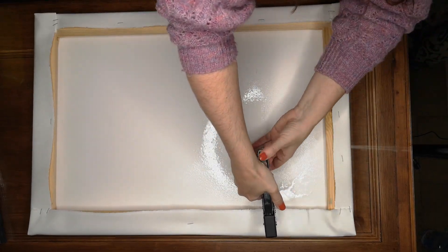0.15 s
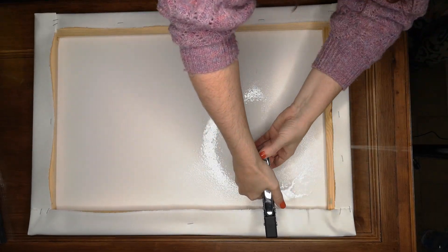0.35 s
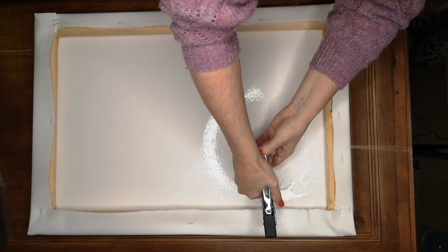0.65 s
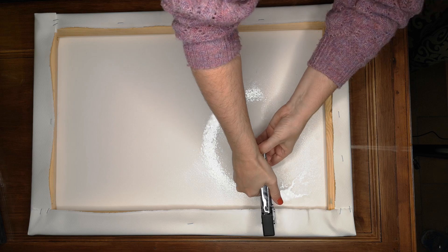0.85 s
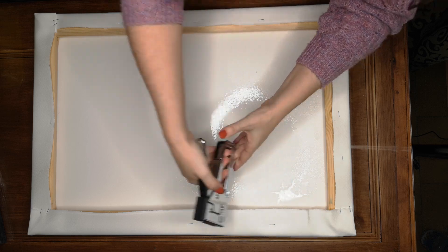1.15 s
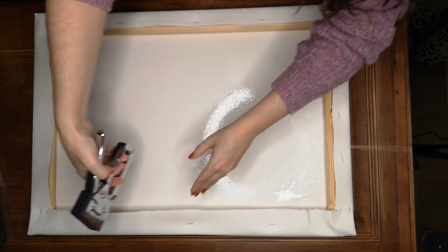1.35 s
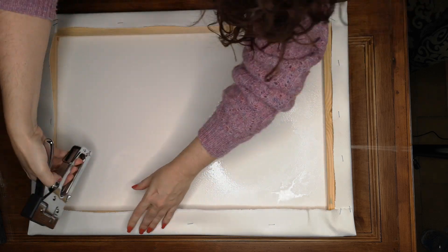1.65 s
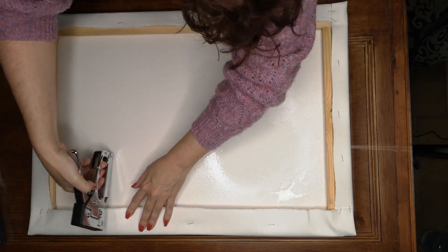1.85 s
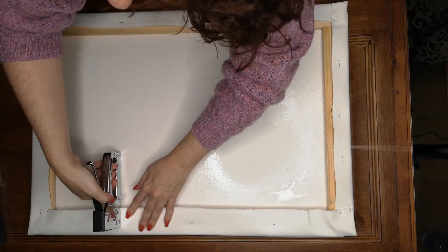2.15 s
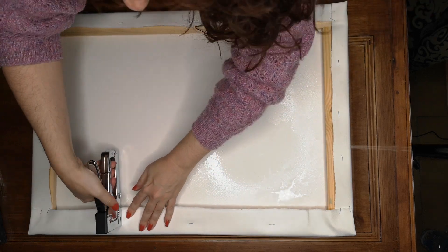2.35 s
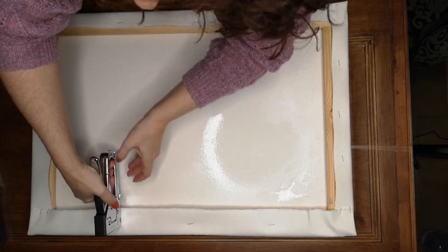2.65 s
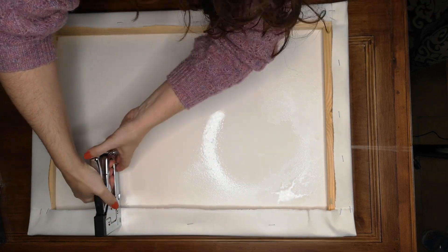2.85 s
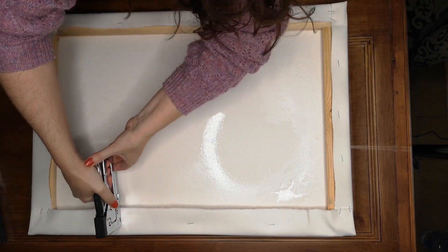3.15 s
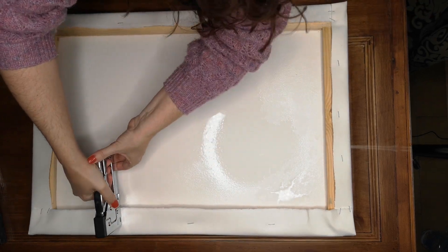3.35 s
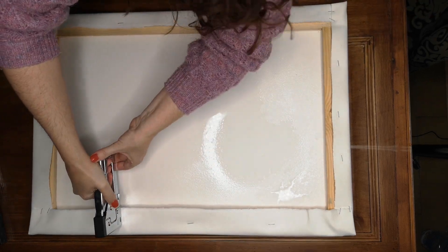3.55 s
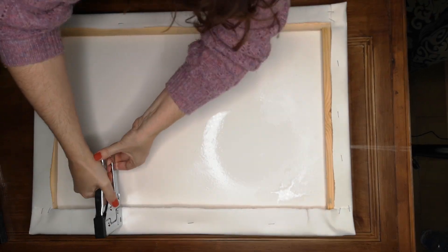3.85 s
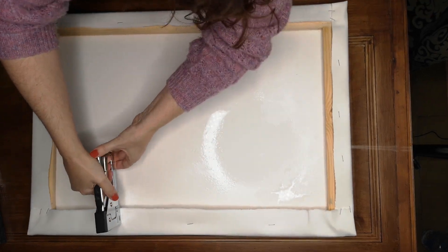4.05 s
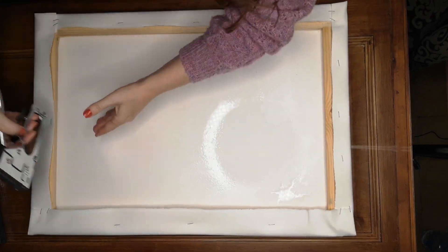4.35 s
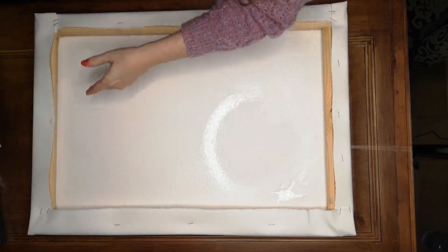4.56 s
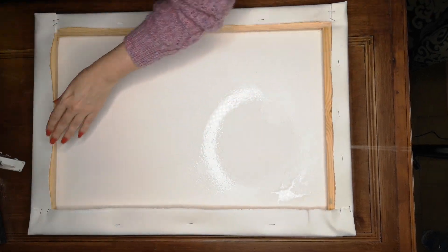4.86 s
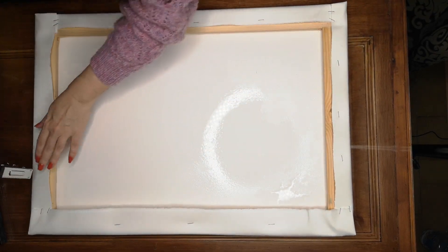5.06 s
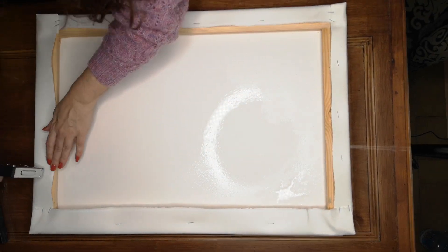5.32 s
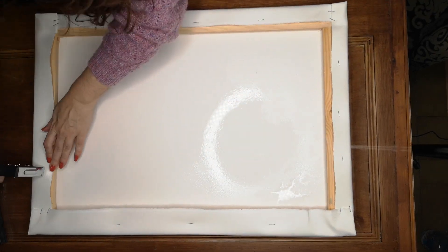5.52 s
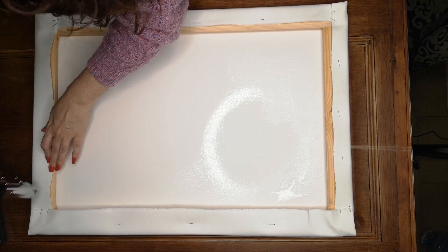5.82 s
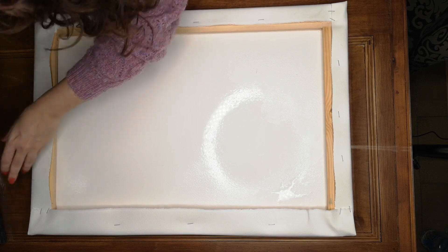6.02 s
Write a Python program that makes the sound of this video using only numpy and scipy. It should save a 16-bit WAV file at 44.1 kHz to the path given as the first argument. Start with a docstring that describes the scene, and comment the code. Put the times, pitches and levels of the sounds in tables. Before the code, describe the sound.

A hand staple gun fires two hard, cracking shots into a wooden frame, each followed by a ringing lever snap, then is laid down.

```python
"""Hands rustle over a steady low machine hum and room air: a staple gun fixes damp paper to a wooden frame on a table.
Twice the lever catches, the spring fires a staple, and the lever unlatches, slides and snaps back with a ring.
Loose steel ticks now and then between and after the shots; at the end the gun is laid down, rocks and settles.
Blows are filtered noise bursts, ringing is damped sines, rubbing is grainy noise; a small live room echoes all
but the hum and air."""
import sys
import numpy as np
from scipy import signal
from scipy.fft import rfft, irfft
from scipy.io import wavfile
from scipy.ndimage import uniform_filter1d

SR = 44100
rng = np.random.default_rng(int(sys.argv[2]) if len(sys.argv) > 2 else 0)


def to_wav(sig):
    """Store sig (one row per channel, or 1-D mono) as 16-bit WAV at the path in sys.argv[1].

    Samples outside -1..1 are clipped; the rate is SR.
    """
    pcm = np.clip(np.atleast_2d(sig), -1, 1) * 32767
    pcm = np.round(pcm).astype(np.int16)
    wavfile.write(sys.argv[1], SR, pcm.T)  # frames by channels


N = 272840
T = np.arange(SR) / SR  # one second of time, in seconds
HZ = np.fft.rfftfreq(SR, 1 / SR)


def amp(db):
    """Decibels to gain."""
    return 10 ** (np.asarray(db) / 20)


def unit(x):
    """Scales to rms 1."""
    return x / np.sqrt(np.mean(x ** 2) + 1e-20)


def read(points, hz):
    """Reads a curve of (Hz, value) points along a log-frequency axis."""
    f, value = np.transpose(points)
    return np.interp(np.log(hz + 1), np.log(f + 1), value)


def add(mix, s, sound):
    """Mixes a sound in at time s, cut at the end of the mix."""
    part = mix[max(round(s * SR), 0):][:len(sound)]
    part += sound[:len(part)]


def dying(t60):
    """Exponential decay over one second, falling 60 dB in t60 seconds."""
    return np.exp(-np.log(1000) * T / max(t60, 1e-4))


def coloured(x, db):
    """Minimum-phase filter of unit energy shaped by the gain curve db over HZ, so attacks stay sharp."""
    log_gain = np.log(amp(np.maximum(db - db.max(), -80)))
    # folding the cepstrum forward in time makes the filter causal
    cepstrum = irfft(log_gain)
    cepstrum[1:SR // 2] *= 2
    cepstrum[SR // 2 + 1:] = 0
    taps = irfft(np.exp(rfft(cepstrum)))[:SR // 10]
    return signal.fftconvolve(x, taps / np.linalg.norm(taps))[:len(x)]


def hump(hz, slope_db):
    """A broad, round-topped resonance that falls towards slope_db per octave on each side."""
    return -slope_db * np.hypot(np.log2((HZ + 1) / hz), .5)


def clash(t60, rise, hold=0):
    """Parts chatter against each other: a dense burst that swells, holds and dies (all in seconds)."""
    swell = np.minimum(T / max(rise, 1e-5), 1)
    decay = np.exp(-np.log(1000) * np.maximum(T - hold, 0) / t60)
    shape = swell * decay
    burst = rfft(shape * rng.standard_normal(SR))
    flat = irfft(burst / (abs(burst) + 1e-12))  # hard contacts excite all frequencies alike
    even = flat * np.sqrt(shape)
    return even * np.linalg.norm(shape) / np.linalg.norm(even)


def ring(modes):
    """Damped modes (Hz, dB, t60 s), all struck at once with random phases."""
    out = np.zeros(SR)
    for (hz, db, t60), phase in zip(modes, rng.random(len(modes))):
        out += amp(db) * dying(t60) * np.sin(2 * np.pi * (hz * T + phase))
    return out


def contact(colour, db, t60, tilt_db):
    """One short blow on a damped body; a positive tilt (dB per octave) brightens it."""
    tilt = tilt_db * np.log2(HZ + 50)
    return amp(db) * coloured(clash(t60, rise=0.00023, hold=0.00046), read(colour, HZ) + tilt)


def tick(db, hz):
    """A small steel part clicks against its neighbour."""
    return amp(db) * coloured(clash(t60=0.02, rise=0.0011), hump(hz, slope_db=11.5))


def rub(length, db, hz):
    """One grainy stroke of two surfaces that stick and slip: noise with a fast, uneven loudness."""
    grip = unit(uniform_filter1d(rng.standard_normal(SR), size=260))
    grains = unit(rng.standard_normal(SR) * amp(4 * grip))
    stroke = np.sqrt(abs(np.sin(np.pi * np.minimum(T / length, 1))))
    return amp(db) * stroke * coloured(grains, hump(hz, slope_db=11.5))


# Hiss and rumble of the room air. Each row: frequency in Hz, relative density in dB per Hz.
AIR_SPECTRUM = [(10, -11), (20, -14), (42, -5), (56, -7.5), (68, -19.5), (105, -22.5), (130, -15),
                (350, -15), (410, -19), (640, -17.5), (1290, -24.5), (2840, -39), (4900, -46),
                (11900, -47.5), (16000, -52.5)]
# Machine hum and whine. Each row: frequency in Hz, rms level in dB.
HUM_TONES = [(56.8, -59.5), (51, -65.5), (223, -71), (271, -74.5), (638, -73), (7970, -95), (11520, -93),
             (12516, -95.5)]
AIR_DB = -59.5  # rms of the air above 100 Hz


def background(waver=.5):
    """Room air as shaped noise, with a machine hum and faint whine whose phases wander slightly."""
    f, t = np.fft.rfftfreq(N, 1 / SR), np.arange(N) / SR
    air = rfft(rng.standard_normal(N)) * amp(read(AIR_SPECTRUM, f))
    above_hum = np.std(irfft(air * (f > 100), N))
    out = amp(AIR_DB) * irfft(air, N) / above_hum
    for hz, db in HUM_TONES:
        drift = waver * np.cumsum(rng.standard_normal(N)) * np.sqrt(hz / 50 / SR)
        out += amp(db) * np.sqrt(2) * np.sin(2 * np.pi * hz * t + drift)
    return out


RATTLE_PER_S, RATTLE_OVER_RUSTLE_DB = 16, 12.5
RATTLE_SPREAD_DB, RATTLE_SPREAD_OCTAVES = 3, .7  # either way


def rattle(length, db, hz):
    """Faint ticks of uneven spacing, strength and pitch while the gun shifts in the hand."""
    out = np.zeros(SR)
    for k, (when, size, pitch) in enumerate(rng.uniform(-1, 1, (10, 3))):
        s = (k + (when + 1) / 2) / RATTLE_PER_S
        if s < length:
            add(out, s, tick(db + RATTLE_SPREAD_DB * size, hz * 2 ** (RATTLE_SPREAD_OCTAVES * pitch)))
    return out


# The hands shift their grip. Each row: start in seconds, length in seconds, rustle level in dB, centre in Hz.
GRIP_CHANGES = [(0.0, 0.31, -70.5, 5000), (2.5, 0.28, -72, 2780), (4.87, 0.35, -71.5, 4200),
                (5.932, 0.3, -75.5, 4350)]


def grip_changes(blows):
    """Shifting hands rustle as one rub and rattle the gun faintly."""
    for s, length, db, hz in GRIP_CHANGES:
        add(blows, s, rub(length, db, hz))
        add(blows, s, rattle(length, db + RATTLE_OVER_RUSTLE_DB, hz))


# The gun bumps on the frame as it is placed. Each row: start in seconds, level in dB, tilt in dB per octave.
FRAME_KNOCKS = [(0.442, -48, 0.5), (1.782, -47.5, -1), (2.4179, -47.5, 1), (2.640, -43.5, -2),
                (3.3972, -42, -1)]
# Tone of the gun bumping on wood. Each row: frequency in Hz, relative density in dB per Hz.
KNOCK_SPECTRUM = [(59, -35.5), (100, -16.5), (547, -12), (910, -2), (1330, -12.5), (1450, -16.5),
                  (1680, -10), (1870, -15), (2800, -18), (3620, -29), (3940, -20.5), (5300, -29.5),
                  (5650, -39.5), (10900, -27.5), (16000, -33)]
KNOCK_T60_S = .028


def frame_knocks(blows):
    """The gun touches the damped frame in short, dull contacts."""
    for s, db, tilt_db in FRAME_KNOCKS:
        add(blows, s, contact(KNOCK_SPECTRUM, db, KNOCK_T60_S, tilt_db))


# Brief grainy rubs: the lever creaks as it is squeezed, the gun brushes paper and table.
# Each row: start in seconds, length in seconds, level in dB, centre in Hz.
BRIEF_RUBS = [(0.518, 0.031, -66.5, 4000), (1.869, 0.058, -67.5, 3100), (3.9, 0.077, -74, 2170),
              (5.317, 0.0894, -62, 10100), (5.307, 0.24, -65, 2800)]


def brief_rubs(blows):
    """Surfaces stick and slip in brief grainy strokes, as a lever creak or a brush on paper and table."""
    for s, *stroke in BRIEF_RUBS:
        add(blows, s, rub(*stroke))


# The lever catches as it is squeezed. Each row: start in seconds, level in dB, t60 in seconds, tilt in dB per octave.
LEVER_CATCHES = [(0.5733, -20.5, .014, 1), (3.5233, -22.5, 0.019, 1)]
# Tone of the catch. Each row: frequency in Hz, relative density in dB per Hz.
CATCH_SPECTRUM = [(88, -44), (150, -20), (240, -22.5), (504, -5.5), (960, -4), (1310, 0.5), (2020, -7),
                  (2650, -21), (2870, -18), (4240, -11.5), (9440, -27), (10800, -19), (16000, -27.5)]


def lever_catches(blows):
    """The squeezed lever catches with one short, damped clack."""
    for s, *blow in LEVER_CATCHES:
        add(blows, s, contact(CATCH_SPECTRUM, *blow))


# The spring fires. Each row: start in seconds, crack level in dB, frame level in dB, casing level in dB,
# place on the frame.
STAPLE_SHOTS = [(0.8040, 0, -14, -36, "right"), (3.8995, 0.5, -17, -28.5, "left")]
# Tone of the driver's crack. Each row: frequency in Hz, relative density in dB per Hz.
CRACK_SPECTRUM = [(60, -34.5), (130, -21.5), (400, -6.5), (1000, -3), (1550, -4.5), (2170, -4.5),
                  (2800, -6.5), (4000, -10), (4500, -5.5), (5300, -2.5), (7450, -11), (10500, -8.5),
                  (11500, -4), (16000, -15.5)]
# Dense ring of frame, paper and table, by place. Each row: frequency in Hz, relative density in dB per Hz.
FRAME_SPECTRA = {"right": [(60, -50), (115, -29), (190, -11.5), (240, -15), (376, -10.5), (440, -13.5),
                 (535, -5), (680, -18), (1100, -12.5), (1570, -13), (1900, -20), (6580, -33.5),
                 (11100, -28), (16000, -40)], "left": [(60, -45), (100, -29), (150, -11), (330, -7.5),
                 (440, -12.5), (532, -7), (650, -12), (1070, -5.5), (1270, -15.5), (1550, -3), (1750, -12),
                 (2430, -13.5), (3010, -5), (4000, -17), (6030, -22.5), (11100, -23.5), (16000, -27)]}
# Modes of the frame and its stretched sheet, by place. Each row: frequency in Hz, relative level in dB, t60 in seconds.
FRAME_RING_MODES = {"right": [(161.7, -6.5, .55), (204.7, -2.5, 0.7), (271.3, -6, .45), (321, -5.5, .4),
                    (384.4, -2.5, .48), (484, 0, .45), (539, 6, 0.64), (793, -3.5, .22), (1093, 2, 0.38),
                    (1250, 3, .24), (1560, 1, 0.34)], "left": [(165.6, -11, 0.79), (208.6, -4, 0.69),
                    (322, -2, .45), (365.5, 0, .42), (533, 1.5, .48), (813, 3.5, .2), (1030, 4, .25),
                    (1540, 1.5, .35)]}
# Modes of the gun's steel casing. Each row: frequency in Hz, relative level in dB, t60 in seconds.
CASING_MODES = [(2280, -2, .25), (2765, -0.5, .3), (2870, -3.5, 0.5), (2980, 0.5, 0.49), (3380, -7, 0.5),
                (5140, -6, .3), (7240, -2.5, 0.17), (11657, 0.5, .15)]


def shot(crack_db, frame_db, casing_db, place, modes_db=-9.5, swell=0.0028):
    """The driver slams the staple home; the heavier frame takes a moment to swing, then rings on."""
    crack = amp(crack_db) * coloured(clash(t60=0.032, rise=.003, hold=0.0033), read(CRACK_SPECTRUM, HZ))
    frame = amp(frame_db) * coloured(clash(t60=0.19, rise=0.0072), read(FRAME_SPECTRA[place], HZ))
    frame_ring = amp(frame_db + modes_db) * ring(FRAME_RING_MODES[place])
    casing_ring = amp(casing_db) * ring(CASING_MODES)
    return crack + frame, (frame_ring + casing_ring) * (1 - np.exp(-T / swell))


def staple_shots(blows, rings):
    """Places each shot, with its blow and its ringing kept apart for the room mix."""
    for s, *levels in STAPLE_SHOTS:
        blow, ringing = shot(*levels)
        add(blows, s, blow)
        add(rings, s, ringing)


# The frame hops and drops back on the table. The single row: start in seconds, level in dB, centre in Hz.
FRAME_REBOUND = (0.8497, -4, 480)


def frame_rebound(blows):
    """The frame drops back on the table: one smooth push through a broad resonance."""
    s, db, hz = FRAME_REBOUND
    push = np.pad(signal.windows.hann(12), (0, SR // 10))
    add(blows, s, amp(db) * coloured(push, hump(hz, slope_db=8)))


# The clearest clicks of loose steel in the gun. Each row: start in seconds, level in dB, centre in Hz.
LOOSE_TICKS = [(1.139, -48.5, 11160), (1.8973, -50, 9100), (2.4175, -41.5, 8150), (2.875, -55.5, 6000),
               (3.515, -46, 11000), (4.655, -50, 12040), (4.7543, -45, 11500)]


def loose_ticks(blows):
    """Loose steel parts click inside the gun."""
    for s, db, hz in LOOSE_TICKS:
        add(blows, s, tick(db, hz))


def cluster(hz, width, t60, count=36):
    """Closely spaced steel partials that beat as they die, weaker away from the centre."""
    spread = 5 * ((np.arange(count) + rng.random(count)) / count - .5)  # in widths
    partials = [(hz + width * u, -10 * np.log10(1 + (2 * u) ** 2), t60) for u in spread]
    return ring(partials) / np.sqrt(count / 6)


# The lever snaps back. Each row: start in seconds, snap level in dB, clash t60 in seconds, ring level in dB.
LEVER_RETURNS = [(1.2895, -3, 0.017, -39.5), (4.3542, -0.5, 0.01, -41.5)]
# Tone of the snap. Each row: frequency in Hz, relative density in dB per Hz.
SNAP_SPECTRUM = [(150, -23.5), (1050, -18.5), (1570, -3.5), (2000, -13.5), (3000, -13), (3450, -7),
                 (4000, -14.5), (4900, -6.5), (5480, 4), (6100, -5.5), (7200, -15), (8600, -5.5),
                 (9700, -7.5), (11400, 2.5), (13000, -12), (15400, -12)]
# Steel modes in lever and spring. Each row: centre in Hz, width in Hz, relative level in dB, t60 in seconds.
LEVER_CLUSTERS = [(1594, 115, -13, .75), (2150, 300, -9.5, .9), (3440, 150, -2.5, .7), (4160, 400, -15, .7),
                  (5650, 260, -10.5, .72), (6340, 700, -5, .6), (8527, 560, -7, .45),
                  (11300, 920, -3.5, 0.37)]
UNLATCH_LEAD_S, UNLATCH_DB, UNLATCH_HZ = .0405, -43.5, 11800
SLIDE_S, SLIDE_DB, SLIDE_HZ = .024, -45, 4900


def lever_snap(db, t60, ring_db):
    """Steel meets steel, and the lever and spring sing briefly."""
    snap = amp(db) * coloured(clash(t60, rise=.0005, hold=0.00084), read(SNAP_SPECTRUM, HZ))
    steel = sum(amp(level) * cluster(hz, width, decay) for hz, width, level, decay in LEVER_CLUSTERS)
    return snap + amp(ring_db) * steel


def lever_returns(blows):
    """The lever unlatches with a tick, then slides until it hits its stop."""
    for s, *snap in LEVER_RETURNS:
        add(blows, s - UNLATCH_LEAD_S, tick(UNLATCH_DB, UNLATCH_HZ))
        add(blows, s - SLIDE_S, rub(SLIDE_S, SLIDE_DB, SLIDE_HZ))
        add(blows, s, lever_snap(*snap))


# The hands bump the frame softly. Each row: start in seconds, level in dB.
HAND_BUMPS = [(2.06, -52.5), (2.25, -48), (4.96, -55.5)]


def hand_bumps(blows):
    """Soft hands meet the frame slowly, so the thud has little treble."""
    for s, db in HAND_BUMPS:
        add(blows, s, amp(db) * coloured(clash(t60=0.14, rise=.008), hump(152, slope_db=11)))


# The gun lands on one edge, falls flat and settles. Each row: start in seconds, level in dB, t60 in seconds,
# tilt in dB per octave.
GUN_SETTLING = [(5.4591, -27.5, 0.035, 2), (5.4640, -33, 0.09, -3), (5.4729, -34, 0.013, -2.5)]
# Modes of the table. Each row: frequency in Hz, relative level in dB, t60 in seconds.
TABLE_MODES = [(725, 2, .2), (885, 3, 0.42), (968, -6, .35), (1150, -4, .3), (1355, 2.5, 0.26),
               (1680, -1, 0.19), (2300, -10, .4), (2820, -13, .5), (3210, -14, 0.67), (4000, -4, 0.14)]
TABLE_DB = -46


def gun_settling(blows, rings):
    """The gun rocks to rest in quick contacts; the first one rings the table."""
    for s, *blow in GUN_SETTLING:
        add(blows, s, contact(KNOCK_SPECTRUM, *blow))
    first_contact_s = GUN_SETTLING[0][0]
    add(rings, first_contact_s, amp(TABLE_DB) * ring(TABLE_MODES))


# How long the room's tail lasts. Each row: frequency in Hz, t60 in seconds.
ROOM_DECAY = [(150, .6), (500, .65), (1500, .75), (3500, .72), (6000, .55), (9000, .44), (12000, .37),
              (16000, .3)]
# How strong the room's tail is. Each row: frequency in Hz, level in dB.
ROOM_LEVEL = [(150, -2.5), (500, -3.5), (1500, -6.5), (4000, -7.5), (5500, -15), (7500, -11), (11000, -13),
              (13500, -15.5), (16000, -12.5)]


def room(x, first=.004, early_db=-12, early_t60=0.017):
    """A few near reflections, then a diffuse tail whose treble dies first."""
    hz, t, z = signal.stft(rng.standard_normal(SR), SR, nperseg=256)
    t60 = read(ROOM_DECAY, hz)[:, None]
    level = amp(read(ROOM_LEVEL, hz))[:, None]
    decay = np.exp(-np.log(1000) * t / t60)
    even_energy = np.sqrt(2 * np.log(1000) / (t60 * SR))  # long and short decays carry equal energy
    tail = signal.istft(z * level * decay * even_energy, SR, nperseg=256)[1][:SR] * (T > first)
    sparse = rng.standard_normal(SR) * (rng.random(SR) < 1500 / SR)  # about 1500 reflections per second
    early = sparse * dying(early_t60) * (T > first / 2)
    return signal.fftconvolve(x, tail + amp(early_db) * early / np.linalg.norm(early))[:N]


def scene():
    """Catch, shot and return, twice; then the gun is put down."""
    blows, rings = np.zeros(N), np.zeros(N)
    air = background()
    grip_changes(blows)
    frame_knocks(blows)
    brief_rubs(blows)
    lever_catches(blows)
    staple_shots(blows, rings)
    frame_rebound(blows)
    loose_ticks(blows)
    lever_returns(blows)
    hand_bumps(blows)
    gun_settling(blows, rings)
    direct = blows + amp(-1) * rings
    echoes = room(blows + amp(-11.5) * rings)
    return (direct + echoes + air)[None]


EDGE_HZ = 16050  # upper band limit


def record(dry):
    """The loudest peaks saturate softly; then the band limit."""
    ceiling = .92
    pressed = ceiling * np.tanh(dry / ceiling)
    lowpass = signal.firwin(255, EDGE_HZ, window=("kaiser", 8), fs=SR)
    return signal.oaconvolve(pressed, lowpass[None], "same")


dry = scene()
out = record(dry)
to_wav(out)
```